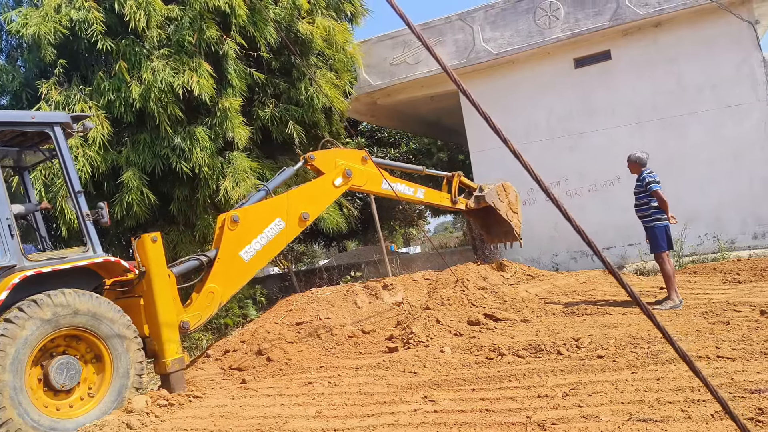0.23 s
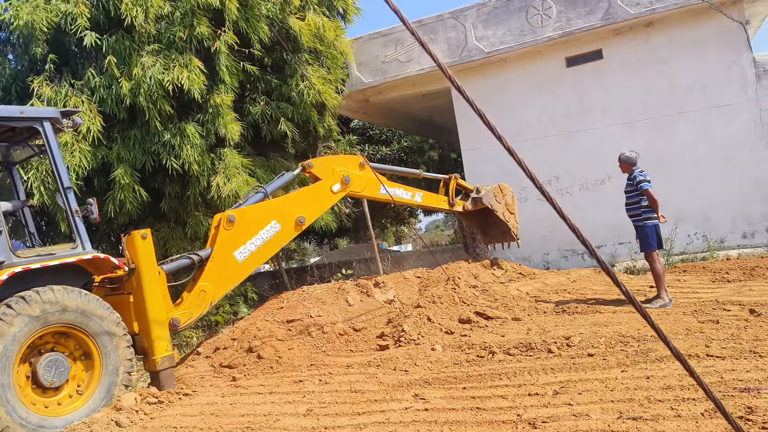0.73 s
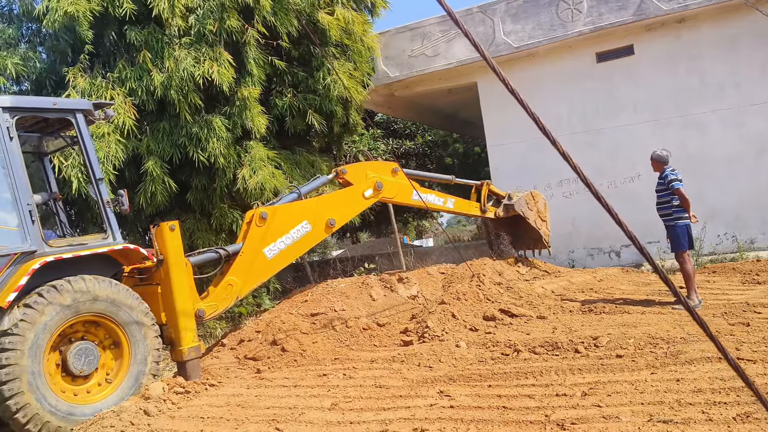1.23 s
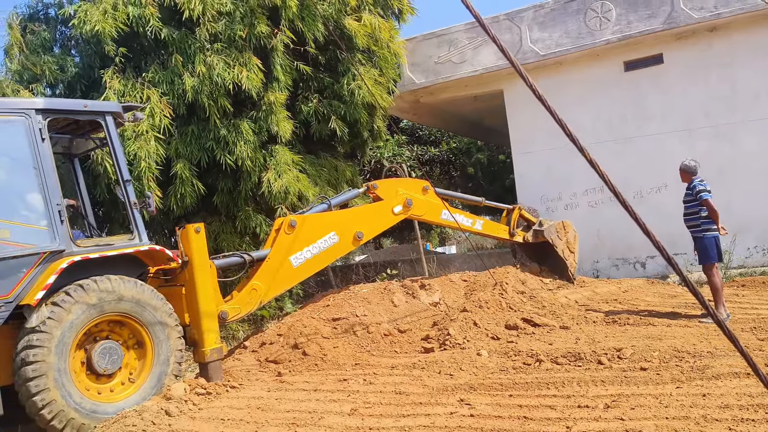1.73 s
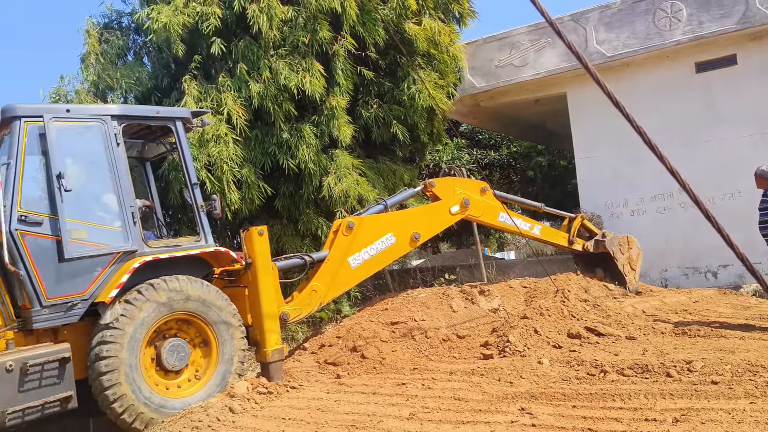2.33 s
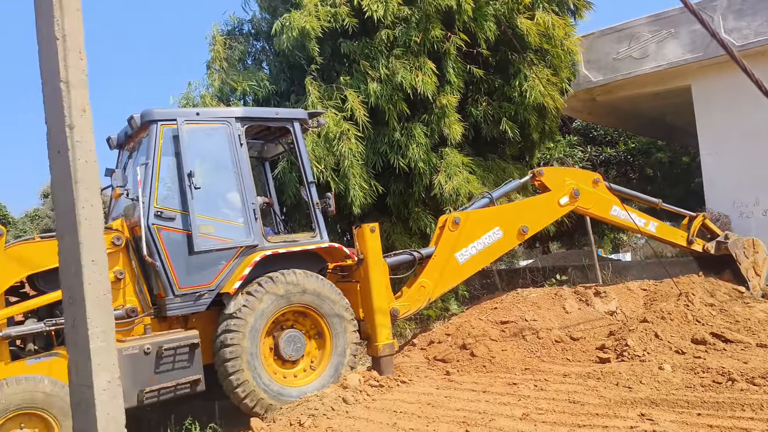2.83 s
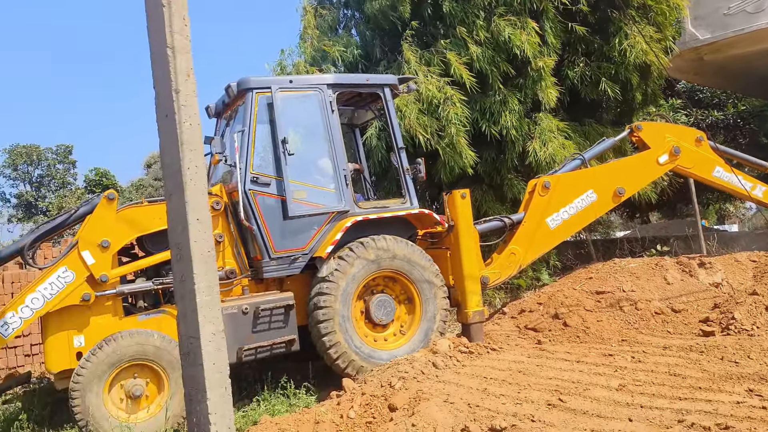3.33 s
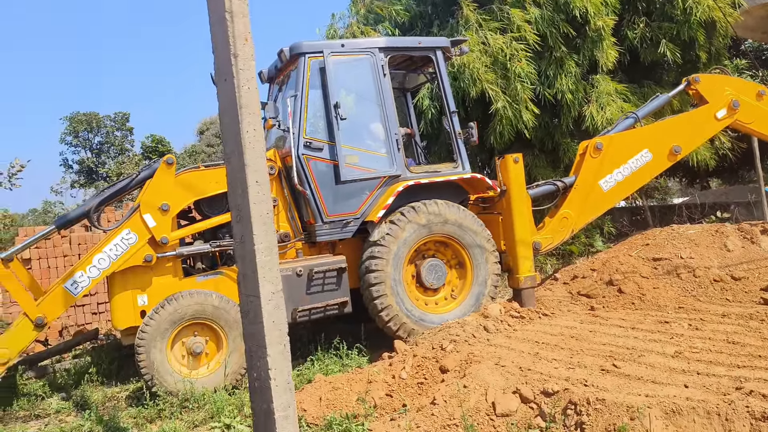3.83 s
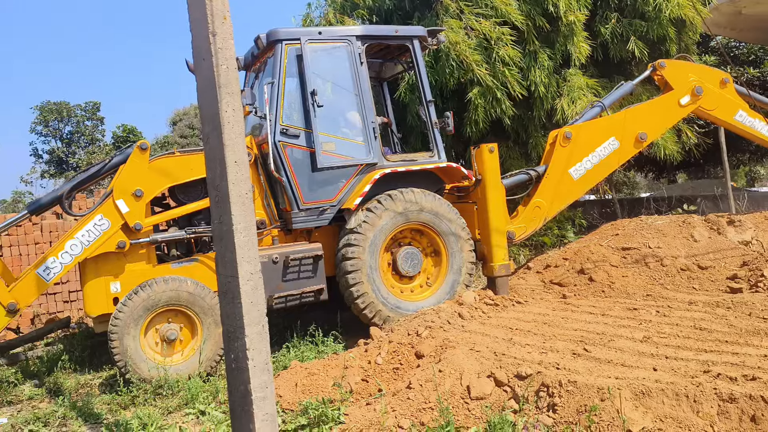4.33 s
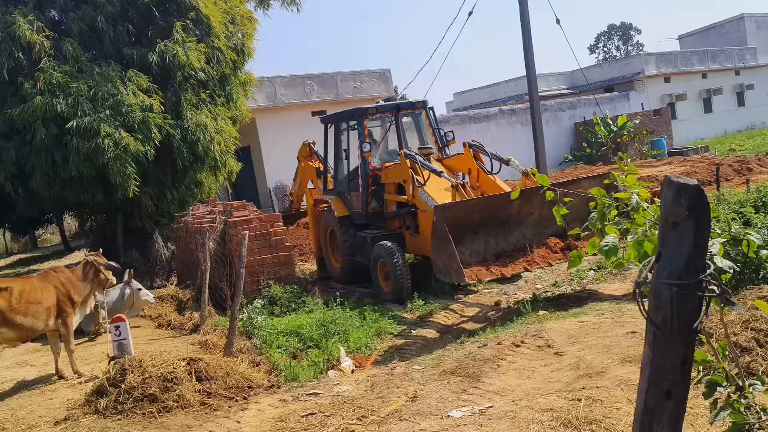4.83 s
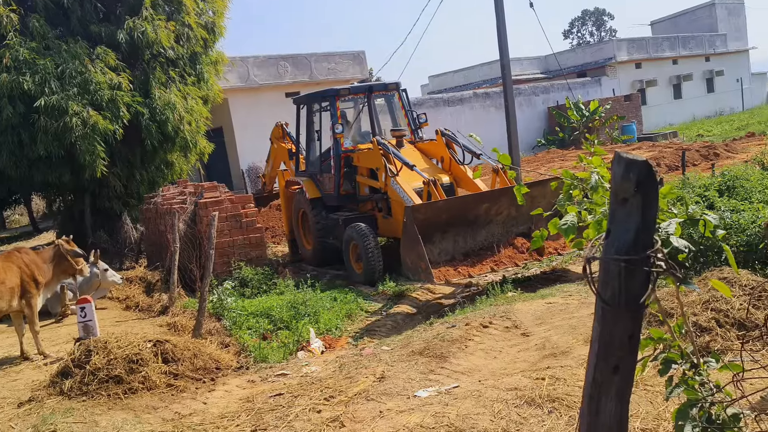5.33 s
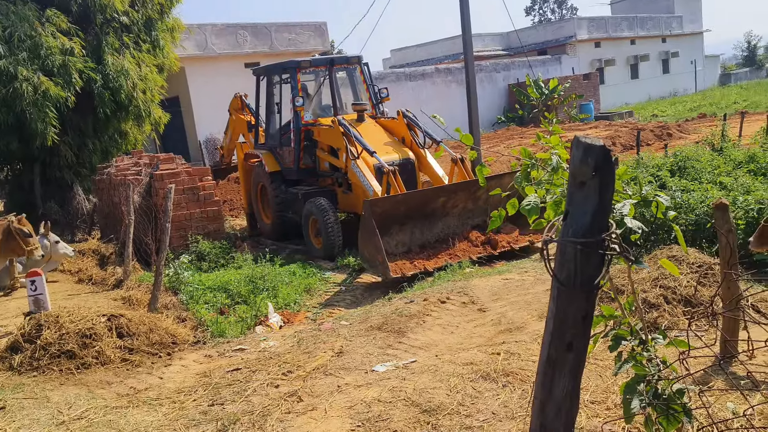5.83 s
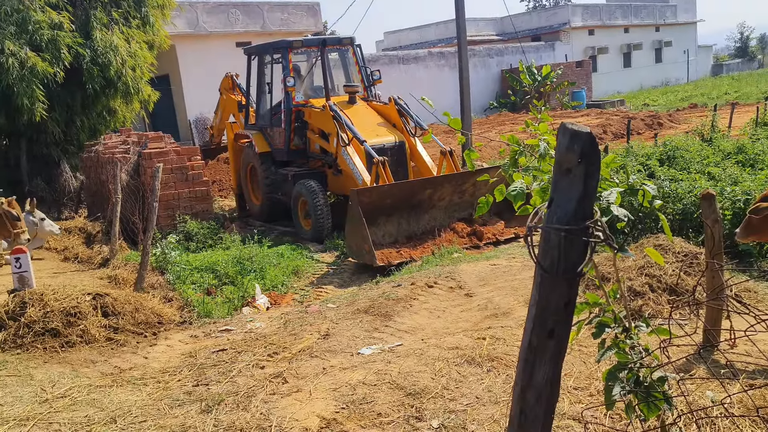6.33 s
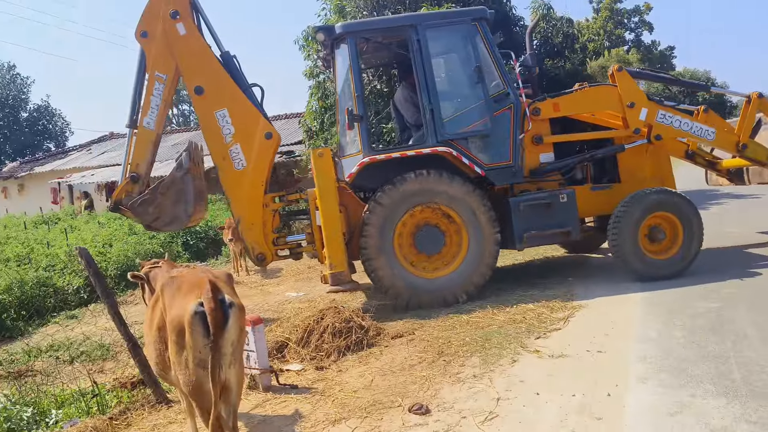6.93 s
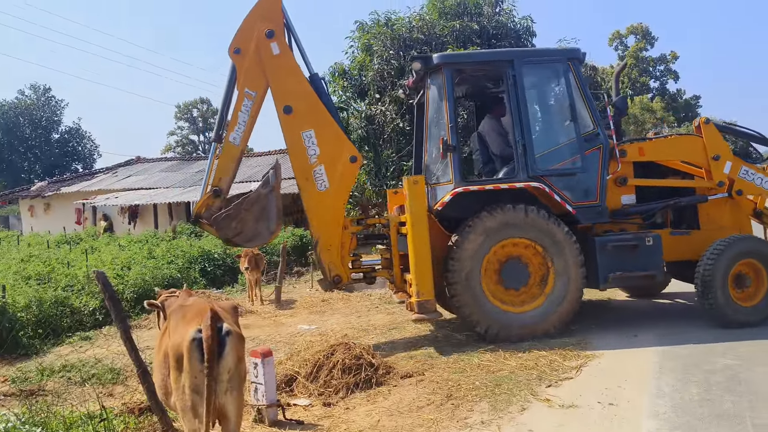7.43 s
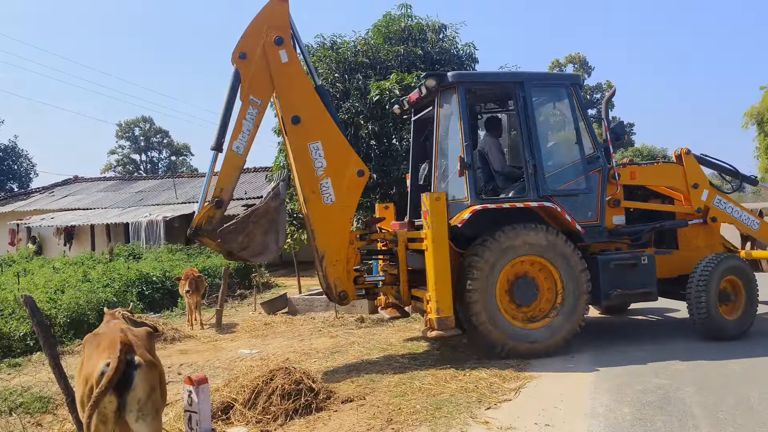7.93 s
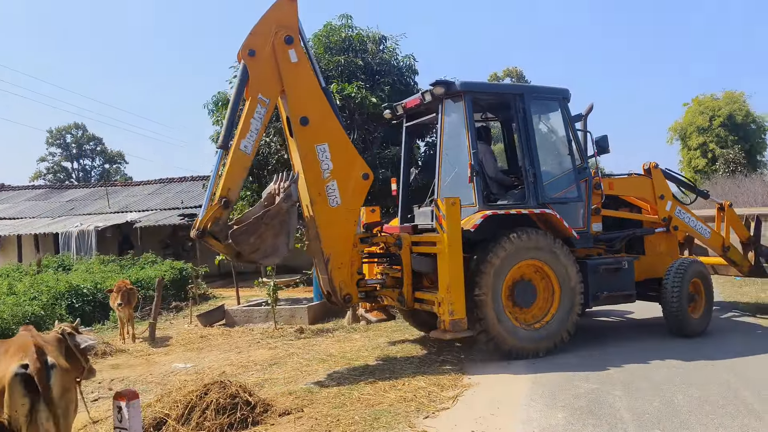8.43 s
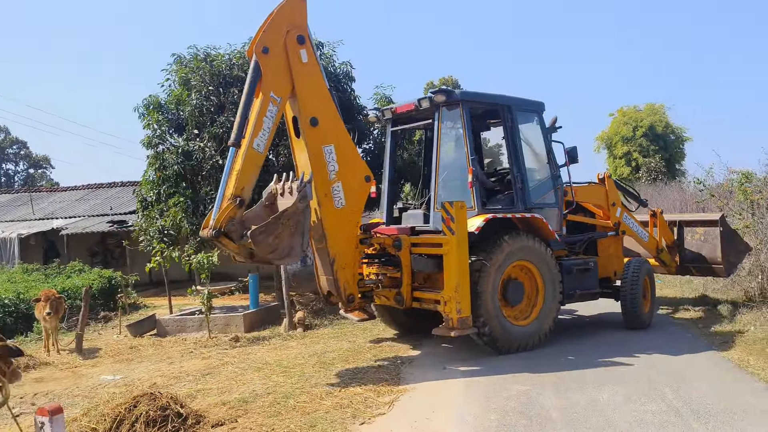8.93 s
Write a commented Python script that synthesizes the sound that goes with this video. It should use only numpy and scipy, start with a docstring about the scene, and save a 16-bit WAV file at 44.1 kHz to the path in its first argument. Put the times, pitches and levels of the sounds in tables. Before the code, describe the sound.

Outdoor diesel clatter and hydraulic hum from a working backhoe loader, with occasional steel knocks and two abrupt short gaps.

```python
"""A four-cylinder diesel digger, heard outdoors from three spots in turn with short silences between.
Firings thump in the exhaust, knock in the block and ring its covers; fan and hydraulic pump hum at fixed
ratios to the crank. Bucket blows and a quick run of engine knocks ring steel modes.
Dull bumps, a dry rustle and light wind are close by.
A handheld two-port microphone colours each side in its own way and is turned once at the first spot."""
import sys
import numpy as np
from scipy import signal
from scipy.fft import rfft, irfft, next_fast_len
from scipy.io import wavfile

SR = 44100
rng = np.random.default_rng(int(sys.argv[2]) if len(sys.argv) > 2 else 0)


def output_pcm(signal):
    """Save a mono or channel-first signal as 16-bit PCM at the path in sys.argv[1].

    Samples are clipped to [-1, 1] before scaling.
    """
    pcm = np.clip(np.atleast_2d(signal).T, -1, 1) * 32767
    wavfile.write(sys.argv[1], SR, np.round(pcm).astype(np.int16))


N = 404397
TIME_S = np.arange(N) / SR
BLADES_PER_FIRING, PUMP_PER_FIRING = 3.67, 5.0
FACING_CACHE = {}

# audible span of each spot: start_s, fade_in_s, end_s, fade_out_s
SPOTS = [(-1, .02, 4.784, 0.0054), (5, 0.035, 6.684, 0.0054), (6.885, 0.026, 10, .02)]
# microphone bearings, the first two at spot one: start_s, end_s
BEARINGS = [(0, 3.05), (3.05, 4.906), (4.9, 6.8), (6.8, 9.22)]
# relation of the two ports, per bearing: freq_hz, coherence, left_lead_rad
PORT_COHERENCE = [
    [(30, 0.92, 0.5), (260, 0.9, 0.4), (330, 0.65, 1.8), (400, 0.98, 3), (625, 0.8, 3), (690, 0.26, 1.2),
     (760, 0.7, 0.75), (1075, 0.9, 3), (1270, 0.86, 3.5), (1840, 0.9, 4), (2010, 0.8, 4.5),
     (2200, 0.1, 6.5), (2460, 0.3, 3.5), (2640, 0.2, 0.8), (2780, 0.6, 1.0), (3440, 0.4, 3),
     (3650, 0.25, 3.5), (4170, 0.39, 7.8), (4800, 0.2, 11), (5630, 0.26, 13), (6860, 0.5, 17.5),
     (15600, 0.05, 18)],
    [(30, 0.8, 0), (260, 0.9, 0.1), (378, 0.9, 0.5), (600, 0.9, 3), (624, 0.35, 3.5), (649, 0.37, 6.5),
     (660, 0.68, 6), (880, 0.88, 7.1), (1280, 0.87, 10), (1390, 0.24, 9), (1520, 0.51, 14.5),
     (1600, 0.83, 14.5), (2040, 0.6, 16.5), (2230, 0.46, 20.5), (2460, 0.6, 21), (2800, 0.3, 23.5),
     (3510, 0.3, 19), (3780, 0.2, 21), (4870, 0.64, 21), (5740, 0.3, 20.5), (6860, 0.4, 24),
     (15600, 0.05, 22.5)],
    [(30, 0.92, -1.5), (260, 1, 0.04), (370, 0.87, 0.35), (472, 0.5, 1.3), (620, 0.6, 0.3),
     (860, 0.85, 0.2), (950, 0.49, 1.0), (1080, 0.6, 1.5), (1270, 0.13, 1.5), (1330, 0.33, 0),
     (1400, 0.47, -0.7), (1740, 0.31, 0.2), (2030, 0.61, 1.5), (2330, 0.9, 1.0), (2930, 0.7, 1.5),
     (3510, 0.6, 3), (3810, 0.52, 2.5), (4370, 0.18, 3), (4870, 0.26, 7.5), (5740, 0.1, 9),
     (6860, 0.04, 5.5), (15600, 0.05, 5.2)],
    [(30, 0.92, -0.5), (260, 0.97, -0.2), (380, 0.94, -1), (470, 0.8, -2.0), (515, 0.66, -2.5),
     (580, 0.73, -3.5), (620, 0.53, -4.0), (680, 0.63, -5.5), (730, 0.65, -5.5), (1060, 0.87, -9),
     (1130, 0.75, -8.5), (1340, 0.6, -9.0), (1490, 0.54, -9.9), (1680, 0.81, -10.7), (2300, 0.89, -10.5),
     (2700, 0.84, -11.5), (3410, 0.6, -11.5), (3970, 0.45, -10), (4310, 0.24, -8.5), (5290, 0.42, -7.5),
     (6860, 0.3, -6.5), (15600, 0, -6.7)],
]


def from_db(db):
    """Amplitude gain of a level."""
    return np.exp(np.asarray(db) * (np.log(10) / 20))


def pan(pan_db):
    """Stereo gains for a left-minus-right level."""
    return from_db(pan_db * np.array([[.5], [-.5]]))


def in_time(tables):
    """Columns of joined time tables, per sample."""
    time_s, *columns = np.concatenate(tables).T
    return [np.interp(TIME_S, time_s, column) for column in columns]


def at_hz(points, hz, column=1):
    """Table column interpolated over log frequency."""
    points = np.array(points)
    return np.interp(np.log(hz + 1), np.log(points[:, 0]), points[:, column])


def drift(rate_hz):
    """Slow random wander, unit spread."""
    hop, warmup = 40, 2000
    pole = np.exp(-2 * hop * np.pi * rate_hz / SR)
    noise = rng.standard_normal(N // hop + warmup + 2)
    slow = signal.lfilter([1], [1, -2 * pole, pole * pole], noise)[warmup:]
    return np.interp(np.arange(N) / hop, np.arange(len(slow)), slow / slow.std())


def swells(rows, order=2):
    """Bell-shaped level changes in dB; higher order flattens the top."""
    out_db = np.zeros(N)
    for centre_s, half_s, lift_db in rows:
        near = abs(TIME_S - centre_s) < 4 * half_s
        out_db[near] += lift_db * np.exp(-.5 * ((TIME_S[near] - centre_s) / half_s) ** order)
    return out_db


def ring(force, hz, t60_s, q):
    """One damped mode, its onset softened by a band-pass."""
    radius, angle = from_db(-60 / (t60_s * SR)), 2 * np.pi * hz / SR
    mode = signal.lfilter([0, np.sin(angle)], [1, -2 * radius * np.cos(angle), radius ** 2], force + 1e-18)
    return signal.lfilter(*signal.iirpeak(hz, q, fs=SR), mode)


def facing(k):
    """Share of the sound at bearing k; only the turn from first to second is gradual."""
    if k not in FACING_CACHE:
        start_s, end_s = BEARINGS[k]
        turn_s, switch_s = .55, .02
        rise = (TIME_S - start_s + (k == 0)) / (turn_s if k == 1 else switch_s)
        fall = (end_s - TIME_S + (k == 3)) / (turn_s if k == 0 else switch_s)
        FACING_CACHE[k] = np.clip(.5 + np.minimum(rise, fall), 0, 1)
    return FACING_CACHE[k]


def by_bearing(levels_db, slopes_db_per_s=(0, 0, 0, 0)):
    """Level in dB set per bearing, sloping about its mid time."""
    return sum(facing(k) * (levels_db[k] + slopes_db_per_s[k] * (TIME_S - np.mean(span_s)))
               for k, span_s in enumerate(BEARINGS))


def port_response(bearing, hz):
    """Response of the ports to a shared and an unrelated sound; axes: port, sound, frequency."""
    # colour of each port, per bearing: freq_hz, gain_db
    left_colour = [
        [(30, -13), (60, 2), (130, 5.5), (260, 0.0), (420, 10.5), (600, 4), (660, 1), (930, 1), (1080, 4),
         (1170, 1.0), (1260, 2.5), (1480, -2), (1650, 0.5), (1950, 0.5), (2110, -9.5), (2290, -1.5),
         (2520, -8.5), (2740, -3), (2930, -5), (3230, -12), (3460, -10.0), (3910, -14.0), (4800, -11),
         (5440, -14.5), (6150, -14.5), (7550, -16.5), (8200, -25.5), (15600, -28)],
        [(30, -13), (60, 4.5), (160, 2.5), (260, -1), (410, 3.5), (520, -1.5), (580, 3.0), (630, -3.5),
         (870, 0), (920, -1), (980, 3), (1340, -5.0), (1540, -3.5), (1630, 0.5), (1840, -4.5), (1970, -1.5),
         (2060, -8), (2260, -4), (2590, -11.0), (2780, -6.5), (3270, -19.5), (3510, -17), (4020, -17.5),
         (4800, -15.5), (5590, -20.5), (6490, -18), (8200, -32), (15600, -34.5)],
        [(30, -13.5), (120, 2), (260, 0.5), (310, 4.5), (510, -2.5), (650, -4.0), (720, 1), (790, -5.5),
         (870, 1), (970, -5.5), (1070, -1.0), (1130, -4.0), (1460, -3), (1770, -7), (1970, -6.5), (2290, -2),
         (2490, -6.5), (2820, -10.5), (2930, -9.5), (3510, -16), (3700, -14.5), (4190, -18.5), (5220, -18.5),
         (5980, -21.0), (7450, -21), (8200, -31.5), (15600, -28.5)],
        [(30, -18), (110, -8), (160, 2), (260, 3.5), (290, 1.5), (350, 4.5), (410, -0.5), (470, -4), (620, -14),
         (660, -13), (710, -6), (770, -8.5), (870, 0), (1050, -4.5), (1240, -13), (1420, -10), (1700, -7.0),
         (1890, -7), (2000, -4), (2290, -1.0), (2590, -4.5), (2890, -11), (3560, -15.0), (5290, -17.5),
         (6490, -22.0), (7450, -23.5), (8310, -34.5), (15600, -37.5)],
    ]
    right_colour = [
        [(30, -14), (60, 1), (130, 7), (260, -13.5), (320, -12.5), (500, 1), (570, 2.5), (640, -10),
         (710, -7.0), (900, 0.5), (990, 6.5), (1330, -6), (1500, -5.0), (1650, 0), (1820, -2.5), (1970, 2.5),
         (2080, -4.0), (2630, 1.5), (2980, -6.5), (3970, -11.5), (4600, -11), (4740, -5.5), (4990, -5.5),
         (5250, -7), (5430, -12.5), (5900, -11.5), (6490, -17), (9270, -37.5), (9790, -32), (11390, -38),
         (12530, -28), (15600, -63.5)],
        [(30, -12.5), (60, 4), (160, 2), (260, -4), (380, -2.5), (570, -5.5), (630, -13), (720, -0.5), (920, 1),
         (980, 8.5), (1340, -12.5), (1520, -9), (1650, 2), (2080, -9.5), (2490, -1.0), (2860, -10.0),
         (3270, -6), (3600, -12.5), (4390, -12), (4500, -6.5), (4830, -5), (4920, -6), (5020, -9.5),
         (5350, -13.5), (5600, -15.5), (5900, -20.5), (6490, -23), (9270, -40.5), (10070, -37.0),
         (10780, -43.5), (12700, -36.5), (13600, -44.5), (14170, -42), (15600, -64.5)],
        [(30, -13), (120, 2.5), (260, -2), (310, 1), (490, -7), (580, -5.5), (730, 5.0), (860, 1.5),
         (950, -2.5), (1130, -2.5), (1270, -6), (1790, 2), (2110, 2.0), (2290, 6), (2630, 3), (2860, -4),
         (3320, -4), (3510, -8.0), (3760, -4.5), (4190, -6.5), (4800, -3), (6490, -17.0), (8200, -30.5),
         (10490, -28.5), (12030, -22.5), (13790, -30.0), (15600, -30.0)],
        [(30, -18), (110, -6), (160, 2), (260, 2.5), (300, -2.0), (340, 1), (420, -7.0), (490, -3), (540, 2.5),
         (620, 2.5), (710, 7.0), (920, 4.5), (1050, 6.0), (1340, 4.5), (1740, 11), (2000, 12.5), (2260, 11.5),
         (2630, 8.5), (3060, -1), (3760, -8), (4020, -14), (4370, -18.0), (5220, -14), (6490, -23.5),
         (7870, -34), (8420, -39.5), (14170, -38.5), (15600, -50)],
    ]
    coherence = np.clip(at_hz(PORT_COHERENCE[bearing], hz), 0, 1)
    lead_rad = at_hz(PORT_COHERENCE[bearing], hz, column=2)
    left = from_db(at_hz(left_colour[bearing], hz))
    right = from_db(at_hz(right_colour[bearing], hz)) * np.exp(-1j * lead_rad)
    return np.array([[left, 0 * left], [right * coherence, right * np.sqrt(1 - coherence ** 2)]])


def colour_shifts(sound):
    """Narrow engine resonances and broader bands rise and fade; the left-right balance sways."""
    # passing colour shifts: centre_s, half_length_s, freq_hz, width_hz, left_db, right_db
    shifts = [(.4, .5, 2520, 250, 1.5, -3.5), (.4, .5, 780, 200, 1.5, -3.5), (.4, .5, 3050, 350, -2, 2.5),
              (.4, .5, 3500, 300, -3, -2), (.4, .5, 4200, 500, -1, 3), (1.4, .45, 3050, 400, 0.5, -3),
              (1.6, .25, 2520, 200, 1, 2.5), (2.0, .25, 1060, 150, 2.5, 1.5), (2.0, .25, 1620, 200, 0, 1.5),
              (2.2, .4, 760, 200, -0.5, 1.5), (2.9, .22, 2720, 250, -4, -3), (3.4, .3, 1970, 70, 2.5, -3),
              (3.6, .45, 2420, 350, 0, 1.5), (4.6, .2, 2420, 450, -1.5, -4),
              (4.55, .25, 4750, 400, -0.5, -5), (4.68, .12, 5150, 250, 1, 4), (2.75, .3, 1972, 90, -6, -11),
              (5.7, .3, 2293, 60, 1.5, 1.5), (.75, .65, 4770, 130, 1, 3), (.75, .65, 2750, 90, 2.5, 2),
              (.75, .65, 3650, 600, -1.5, -1.5), (.75, .65, 880, 60, 2, 2),
              (.75, .65, 1700, 300, -1.5, -1.5), (2.0, .45, 2590, 90, 2, 2), (3.9, .65, 860, 50, 2, 3),
              (3.9, .65, 1470, 60, 3, 2), (3.0, .2, 4000, 900, 2, 2), (5.6, .5, 725, 60, 2, 3),
              (5.6, .5, 1060, 50, 3, 2), (7.3, .4, 1810, 70, 2, 3), (7.3, .4, 1900, 50, -3, -5),
              (8.4, .6, 1580, 60, 3, 3), (8.4, .6, 1800, 250, -1, -2), (6.2, .25, 1000, 200, 2.5, 1),
              (6.45, .3, 2380, 400, -2, -5), (6.45, .05, 5200, 700, 1.5, 4.5),
              (7.35, .45, 1800, 250, 3, 2.5), (7.35, .45, 2250, 350, -3.5, -0.5),
              (7.35, .45, 550, 120, 4, 0), (8.7, .5, 550, 120, -3, 0.5), (8.7, .5, 2250, 350, 3, 0)]
    # balance: time_s, pan_db
    sway = [(0, 0.7), (0.62, -1.1), (1.5, 0.8), (2.0, 0), (2.9, 0.5), (3.95, -1.5), (4.7, 1.3),
            (5.24, -0.2), (5.86, 0.6), (6.25, 3.5), (6.68, 0.5), (6.9, 0.5), (7.5, -0.5), (8.1, 0.1),
            (9.17, -0.5)]
    out = sound.copy()
    for centre_s, half_s, hz, width_hz, left_db, right_db in shifts:
        near = abs(TIME_S - centre_s) < 2 * half_s
        window = np.exp(-.5 * ((TIME_S[near] - centre_s) / half_s) ** 4)
        band = signal.lfilter(*signal.iirpeak(hz, hz / width_hz, fs=SR), out[:, near])
        out[:, near] += (from_db(window * [[left_db], [right_db]]) - 1) * band
    return out * pan(in_time([sway])[0])


def wind():
    """Light wind: lumpy low noise, separate at each port."""
    level_db, lumps_db, band_hz = -48, 3.5, (32, 85)
    band = signal.butter(2, band_hz, "band", fs=SR, output="sos")
    rumble = signal.sosfilt(band, rng.standard_normal((2, N)))
    return from_db(level_db + lumps_db * drift(2.5)) * rumble / rumble.std()


def rustle():
    """Dry rustle at the second spot: dense fine grains, unrelated left and right."""
    # envelope: time_s, relative_db
    envelope = [(5.3, -56), (5.318, -61), (5.512, -59), (6.012, -49), (6.042, -44), (6.132, -51),
                (6.156, -45.5), (6.416, -43), (6.564, -52.5), (6.66, -53.5)]
    # grain spectrum: freq_hz, gain_db
    colour = [(300, 0), (2000, -3), (5000, 2), (7000, 2), (9500, -3.5), (12500, 1), (15600, -3.5)]
    grains_per_s, size = 11000, next_fast_len(N)
    hits = rng.random((2, N)) < grains_per_s / SR
    strength = from_db(2.2 * np.minimum(rng.exponential(1, (2, N)), 4))
    grains = hits * strength * rng.choice([-1, 1], (2, N))
    hz = np.arange(size // 2 + 1) * SR / size
    sound = irfft(rfft(grains, size) * from_db(at_hz(colour, hz)), size)[:, :N]
    active = (TIME_S > envelope[0][0]) & (TIME_S < SPOTS[2][0])
    return active * from_db(in_time([envelope])[0] + 8) * pan(2) * sound / sound.std()


def bumps():
    """Soft contacts, each pushing one low mode whose pitch may climb."""
    # dull bumps: start_s, level_db, pitch_hz, climb_hz_per_s, t60_s
    contacts = [(6.275, -21, 310, 0, 0.2), (6.33, -26, 140, 350, 0.57), (6.421, -17.5, 180, 100, 0.13),
                (6.462, -25, 330, 0, 0.18), (6.479, -21, 238, 0, 0.16)]
    out, attack_s = np.zeros(N), .0067
    for start_s, level_db, pitch_hz, climb_hz_per_s, t60_s in contacts:
        age_s = np.clip(TIME_S - start_s, 0, 1)
        envelope = from_db(level_db + .5 - 60 * age_s / t60_s) * (1 - np.exp(-age_s / attack_s))
        out += envelope * np.sin(2 * np.pi * (pitch_hz + climb_hz_per_s * age_s / 2) * age_s)
    return out


def metallic_knocks():
    """Bucket blows, then a quick run of engine knocks: a crack and a chatter ring steel modes."""
    # blows: start_s, relative_db, pan_db, centre_hz, rolloff_db_per_octave
    knocks = [(1.826, -11.5, 1.5, 1500, 6), (1.831, -11, 3, 850, 7), (1.832, -14, 0, 3500, 5),
              (2.229, -19, 0, 2700, 16), (2.845, -17, -1.5, 850, 18), (2.888, -16, -4, 980, 18),
              (4.169, -21, -4, 1000, 10), (6.292, -14, -1, 950, 9), (6.328, -20, 0, 800, 12),
              (6.423, -12.5, -0.5, 720, 12), (6.487, -17.5, 0, 800, 12), (7.826, -15, -10.5, 3750, 16),
              (8.177, -1.5, -11, 2180, 17), (8.243, -8, -10, 2280, 32), (8.263, -8, -10, 2330, 28),
              (8.284, -9, -10, 2280, 32), (8.347, -8, -10, 2250, 30)]
    # steel modes: pitch_hz, relative_db, t60_s
    modes = [(673, -2.5, .045), (750, -1, .06), (850, -2, .04), (970, -2.5, .035), (1240, -3.5, 0.018),
             (1540, -2, .025), (2077, -3.5, .07), (2225, -5, .09), (2740, -3.5, 0.023), (3530, -4, .02),
             (3870, -5, 0.023), (4200, -6, .014), (5370, -8, .015), (6400, -10, .012)]
    attack_s, chatter_s, crack, trim_db = .0012, .0078, 25, -10.5
    out, age_s = np.zeros((2, N)), np.arange(4000) / SR
    envelope = np.exp(-age_s / chatter_s) * (1 - np.exp(-age_s / attack_s))
    for start_s, knock_db, pan_db, centre_hz, rolloff_db_per_octave in knocks:
        force = rng.standard_normal(len(age_s)) * envelope
        force[0] = crack
        start = int(start_s * SR)
        for hz, mode_db, t60_s in modes:
            mode = ring(force, hz, t60_s, q=4)
            rolloff_db = rolloff_db_per_octave * abs(np.log2(hz / centre_hz))
            peak_db = knock_db + trim_db + mode_db - rolloff_db + rng.normal(0, 1.5)
            out[:, start:start + len(age_s)] += pan(pan_db) * from_db(peak_db) * mode / abs(mode).max()
    return signal.sosfilt(signal.butter(4, 7200, fs=SR, output="sos"), out)


def whines(firings):
    """Fan, pump and gear whines, locked to the crank and wavering."""
    # partials, per bearing: cycles_per_firing, left_db, right_db
    partials = [
        [(4, -46, -48), (10, -44, -57), (11.01, -42, -52), (15, -39.5, -47)],
        [(4, -45, -45), (11.01, -50, -56), (15, -48, -56), (20, -53, -51), (26, -51, -45)],
        [(4, -49, -49), (7.34, -46, -49), (10, -52, -52), (20, -50, -48), (21, -52, -51)],
        [(7.34, -47, -52), (10, -51, -51), (11.5, -50, -42), (15, -57, -40), (31, -61, -43)],
    ]
    # whine swells: centre_s, half_length_s, lift_db
    lifts = [(2.5, .25, 3), (5.55, .3, 2), (7.0, .25, 5), (8.0, .25, -2)]
    out, swell_db, mean_firing_hz = np.zeros((2, N)), swells(lifts), firings[-1] * SR / N
    for k, rows in enumerate(partials):
        near = facing(k) > 0
        for cycles, left_db, right_db in rows:
            lead_rad = at_hz(PORT_COHERENCE[k], cycles * mean_firing_hz, column=2) * np.array([[1], [0]])
            gain = facing(k) * from_db(3.2 * drift(7.2) + swell_db)
            phase = 2 * np.pi * cycles * firings + .6 * drift(6)
            out[:, near] += gain[near] * np.sin(phase[near] + lead_rad) * from_db([[left_db], [right_db]])
    return np.sqrt(2) * out


def hum(firings, fan_db, load_db, dip_db):
    """Fan, exhaust and pump tones locked to the crank; one port hears them sooner."""
    # firing harmonics 1-3, then pump: level_db at each of four bearings, load_share
    levels = [(-38, -38.5, -38.5, -40, .35), (-36.5, -36, -39.5, -46.5, 0.92), (-48, -45.5, -45, -50, .6),
              (-48, -43.5, -45, -45, 0.22)]
    # pump labouring through ram strokes: centre_s, half_length_s, lift_db
    strokes = [(2.15, .15, 4), (3.42, .24, 7.5), (4.4, .36, 11.5), (6.06, .1, 4), (9.15, .15, 6.5)]
    # bass direction, per bearing: left_lead_s, pan_db
    directions = [(.0004, 0.5), (.0003, 0.7), (.0001, -0.6), (-.0001, -1)]
    dip_shares = [.8, 1.1, .9, .4]
    *harmonics_db, pump_db = [by_bearing(levels_db) + load_share * load_db + dip_share * dip_db
                              for (*levels_db, load_share), dip_share in zip(levels, dip_shares)]
    pump_db += swells(strokes, order=4)
    lead_s, pan_db = sum(facing(k) * np.array(row)[:, None] for k, row in enumerate(directions))
    port_firings = np.array([np.interp(TIME_S + lead_s, TIME_S, firings), firings])
    partials = [(BLADES_PER_FIRING, fan_db), *enumerate(harmonics_db, 1), (PUMP_PER_FIRING, pump_db)]
    out = np.zeros((2, N))
    for cycles, level_db in partials:
        gain = from_db(level_db + .22 + 1.2 * drift(14))
        out += gain * np.sin(2 * np.pi * cycles * port_firings + .22 * drift(8))
    return np.sqrt(2) * out * pan(pan_db)


def cylinder_blows(firings, cylinder_db, valve_db):
    """One impulse per firing and a weaker valve blow half-way, uneven in time and strength."""
    offset_firings, jitter_firings, spread_db = .78, .03, 1.2
    count = np.floor(2 * (firings - offset_firings)).astype(int)
    due = np.flatnonzero(np.diff(count))
    number = count[due + 1]
    timing, force = rng.standard_normal((len(due), 2)).T
    onsets = due + timing * jitter_firings / np.gradient(firings)[due]
    strength_db = np.array(cylinder_db)[number // 2 % 4] + valve_db * (number % 2) + spread_db * force
    blows = np.zeros(N)
    blows[np.clip(onsets, 0, N - 1).astype(int)] = from_db(strength_db)
    return blows


def cover_ring(firings):
    """Covers and panels ring at each firing, hardest for the nearest cylinder."""
    # cover modes: pitch_hz, t60_s, then left_db, right_db at each of four bearings
    modes = [(980, .08, -40, -32, -38, -28.5, -50, -50, -46, -42),
             (1080, .09, -39, -39.5, -39, -39, -40, -46, -50, -44),
             (1580, .035, -40, -39, -28, -24, -43, -40, -40, -31),
             (1700, .035, -39, -38, -28, -24, -42, -38, -40, -30),
             (1972, .08, -38, -32, -31, -38, -48, -44, -46, -36),
             (2293, 0.11, -40, -41, -35, -31, -35, -28, -40, -31),
             (2720, .07, -36, -36, -43, -45, -48, -44, -50, -40),
             (4840, .02, -46.5, -38, -49, -36, -52, -42, -60, -56)]
    # end of the block carrying each mode: end_index
    mode_ends = [1, 1, 0, 0, 1, 1, 0, 1]
    # blow strength, per end: level_db of each cylinder
    ends_db = [
        [0, -12, -5, -12],
        [-4, -8, 0, -9],
    ]
    # swell of the ringing: centre_s, half_length_s, lift_db
    lifts = [(4.05, 0.38, 5.5)]
    blows = [cylinder_blows(firings, cylinder_db, valve_db=-25) for cylinder_db in ends_db]
    out, right_lag_samples = np.zeros((2, N)), 35
    for (hz, t60_s, *sides_db), end in zip(modes, mode_ends):
        mode = ring(blows[end] * rng.uniform(.7, 1, N), hz, t60_s, q=6)
        pair = np.array([mode, np.roll(mode, right_lag_samples)])
        for k, pair_db in enumerate(np.reshape(sides_db, (4, 2, 1))):
            out += facing(k) * from_db(pair_db) * pair
    return from_db(swells(lifts)) * out


def noise_levels_db(load_db, clatter_db, dip_db):
    """Levels of exhaust rumble, bodywork roar, block clatter, injector and valve tick, and hiss."""
    # per layer: level_db by bearing, slope_db_per_s by bearing, load_share, clatter_share
    levels = [((-37.5, -38, -38, -40), (0.5, 2, 0.7, -2.5), 0.44, 0.1), ((-30.4, -30.5, -33, -28.5),
              (-0.19, 0.1, 0.6, -0.95), .15, 0.28), ((-32, -31.5, -28.5, -21.5),
              (-0.31, -0.94, -0.3, -0.59), .05, 0.9), ((-37.5, -38, -35, -38), (-0.8, 1.2, 2.5, 0.7),
              .05, 0.9), ((-46, -48, -51.5, -51.5), (0, -0.6, -1.2, -1.5), .1, .2)]
    # brief swells and dips of rumble, roar and ticking, per layer: centre_s, half_length_s, lift_db
    lifts = [
        [(0.62, 0.1, 4), (6.45, .12, 6.5)],
        [(1.9, .08, 3), (2.49, 0.11, 3), (2.88, .06, 3), (6.33, .1, 2)],
        [],
        [(4.5, .15, -1), (6.26, .06, 5), (6.45, 0.061, 6)],
        [],
    ]
    dip_shares = [.6, .17, .085, .083, .14]
    out_db = []
    for (levels_db, slopes, load_share, clatter_share), rows, dip_share in zip(levels, lifts, dip_shares):
        swing_db = load_share * load_db + clatter_share * clatter_db + dip_share * dip_db
        out_db.append(by_bearing(levels_db, slopes) + swing_db + swells(rows))
    return out_db


def engine_noise(firings, levels_db):
    """Noise bands that swell at each blow and die back, heard through the two ports."""
    # layers, rumble to hiss: low_hz, high_hz, knock_db, decay_s, flicker_db, repeat_share
    layers = [(20, 254, -6, .012, 0.6, 0.28), (249, 1305, -3.5, .008, .7, .5),
              (1270, 3620, 0.5, .008, 0.88, 0.3), (3560, 7600, -5.5, .006, 1, .02),
              (7500, 16500, -3.5, .008, 0.7, 0.02)]
    # knock of each cylinder: level_db
    cylinder_db = [2, -0.5, .5, -1.5]
    rise_s, cycle_steps = .002, 4096
    pole = np.exp(-1 / (rise_s * SR))
    blows = signal.lfilter([1 - pole], [1, -pole], cylinder_blows(firings, cylinder_db, valve_db=-10))
    cycle_step = (firings / 4 % 1 * cycle_steps).astype(int)
    out, common_flicker, pairs = np.zeros((2, N)), drift(5), []
    for _, _, knock_db, decay_s, flicker_db, repeat_share in layers:
        swell = 1 + from_db(knock_db) * signal.lfilter([1], [1, -np.exp(-1 / (decay_s * SR))], blows)
        # the same parts meet in the same order each cycle, so some noise repeats
        repeating = np.sqrt(repeat_share) * rng.standard_normal((2, cycle_steps))[:, cycle_step]
        fresh = np.sqrt(1 - repeat_share) * rng.standard_normal((2, N))
        flicker = from_db(flicker_db * (.3 * common_flicker + drift(14.3)))
        pairs.append(swell * flicker * (repeating + fresh))
    for k in range(len(BEARINGS)):
        near = np.flatnonzero(facing(k))
        size = next_fast_len(len(near), True)
        hz = np.arange(size // 2 + 1) * SR / size
        response = port_response(k, hz)
        for (low_hz, high_hz, *_), pair, level_db in zip(layers, pairs, levels_db):
            band = 1 / np.sqrt((1 + (low_hz / (hz + 1)) ** 8) * (1 + (hz / high_hz) ** 8))
            # the swap keeps neighbouring bearings unrelated
            noise = pair[:, near] if k % 2 else pair[::-1, near] * [[1], [-1]]
            spectrum = rfft(noise, size) * band
            sound = irfft((response * spectrum).sum(axis=1), size)[:, :len(near)]
            out[:, near] += np.sqrt(facing(k)[near]) * from_db(level_db[near]) * sound / sound.std()
    return out


def diesel_engine():
    """The crank times knock, ring and tones; the load swings the hum and noise levels."""
    # running state, per spot: time_s, fan_blade_hz, fan_db, load_swing_db, clatter_swing_db
    running = [
        [(0.0, 154.3, -35, 2.5, 1), (0.42, 152.3, -35.5, 0.5, 1), (0.7, 149.3, -35, -3.5, 1.5),
         (1.1, 147.8, -32.5, -0.5, -0.5), (1.5, 148.9, -33, -1, -1.5), (1.74, 156.4, -34, 4, 1.5),
         (2.05, 165.6, -33.5, 8, 0.5), (2.49, 160.8, -32, 4, 0.5), (2.75, 155.1, -34.5, 1, -1),
         (3.12, 146.4, -36.5, -8.5, 1), (3.35, 144.5, -31.5, 1.5, 0), (3.7, 143.8, -34, 2.5, 1.5),
         (4.1, 139.6, -33, -2.5, 1.5), (4.5, 140.6, -32, -0.5, -0.5), (4.78, 141.8, -35.5, 2, -2)],
        [(5.03, 149.8, -33, 0.5, -3), (5.44, 149.9, -34, 1, 0), (5.9, 150.1, -35, 1, 1.5),
         (6.2, 149.8, -32.5, -1, 0.5), (6.3, 149.6, -44, 0, 1), (6.45, 149.3, -39, 1.5, -2.5),
         (6.68, 152, -36, 1.5, -1.5)],
        [(6.91, 185, -30, 3, 0), (7.15, 183.4, -28, 4, 1.5), (7.55, 175.7, -33, -2, 0),
         (7.75, 172.5, -31.5, 2, 0), (8.35, 172, -31.5, -1, -0.5), (8.76, 170.5, -29.5, -4.5, -0.5),
         (9.17, 173.1, -30.5, -5, -0.5)],
    ]
    # abrupt bass dips: centre_s, half_length_s, depth_db
    dips = [(2.77, 0.12, -12), (3.06, 0.11, -11.5)]
    fan_hz, fan_db, load_db, clatter_db = in_time(running)
    dip_db = swells(dips, order=8)
    firings = np.cumsum(fan_hz / BLADES_PER_FIRING) / SR
    clatter = engine_noise(firings, noise_levels_db(load_db, clatter_db, dip_db)) + cover_ring(firings)
    return colour_shifts(clatter) + hum(firings, fan_db, load_db, dip_db) + whines(firings)


def scene():
    """Engine, metallic knocks and the small sounds close by."""
    return diesel_engine() + metallic_knocks() + bumps() + rustle() + wind()


def record(dry):
    """Gates the three spots, each with a faint dull tail; rounds peaks and cuts the top."""
    tail_s, tail_db, tail_fall_db_per_s, tail_cutoff_hz = .03, -27, 860, 900
    ceiling, cutoff_hz = .85, 15750
    gate, tail = np.zeros(N), np.zeros(N)
    for start_s, rise_s, end_s, fall_s in SPOTS:
        gate += np.clip((TIME_S - start_s) / rise_s, 0, 1) * np.clip((end_s - TIME_S) / fall_s, 0, 1)
        in_tail = (TIME_S > end_s - fall_s) & (TIME_S < end_s + tail_s)
        tail += in_tail * from_db(tail_db - tail_fall_db_per_s * np.maximum(TIME_S - end_s, 0))
    dull = signal.sosfilt(signal.butter(2, tail_cutoff_hz, fs=SR, output="sos"), dry)
    rounded = ceiling * np.tanh((gate * dry + tail * dull) / ceiling)
    return signal.sosfilt(signal.ellip(12, .5, 80, cutoff_hz, fs=SR, output="sos"), rounded)


dry = scene()
out = record(dry)
output_pcm(out)
```